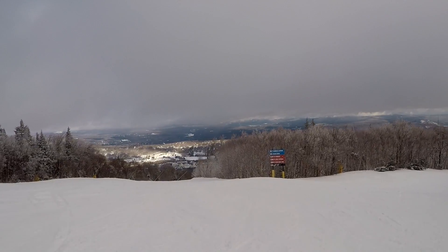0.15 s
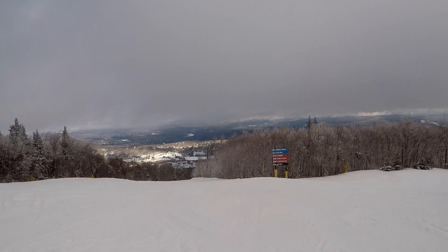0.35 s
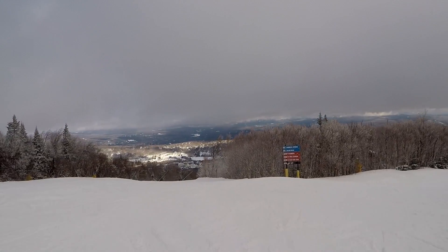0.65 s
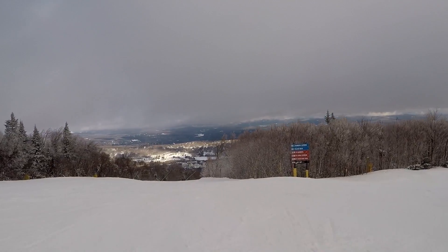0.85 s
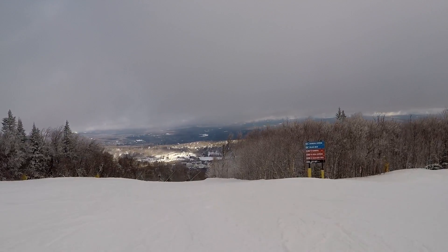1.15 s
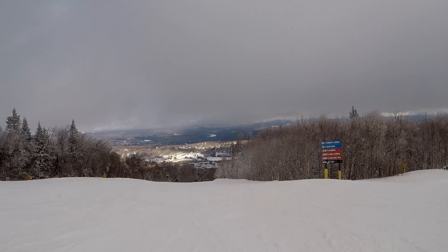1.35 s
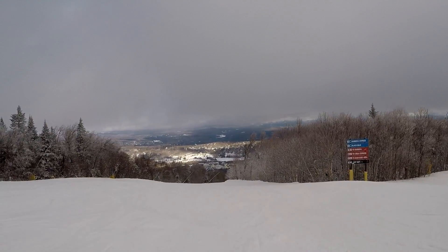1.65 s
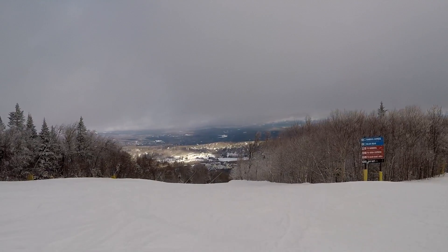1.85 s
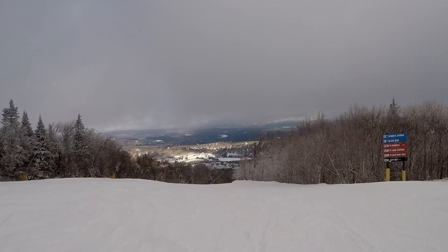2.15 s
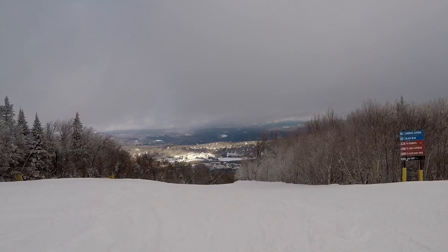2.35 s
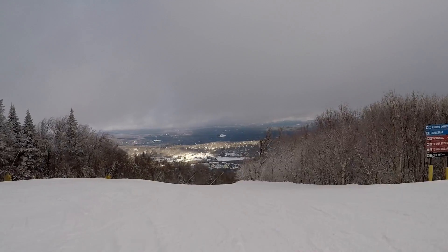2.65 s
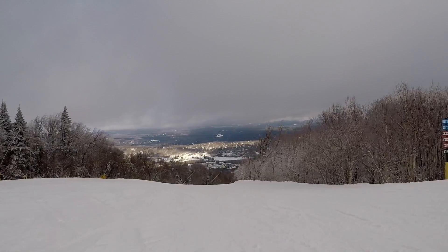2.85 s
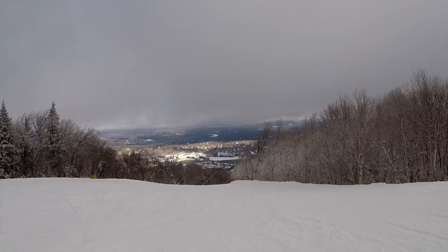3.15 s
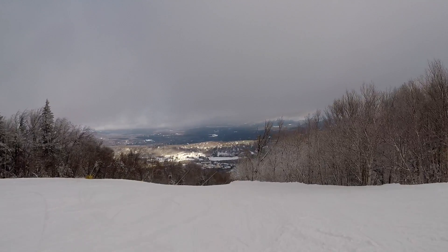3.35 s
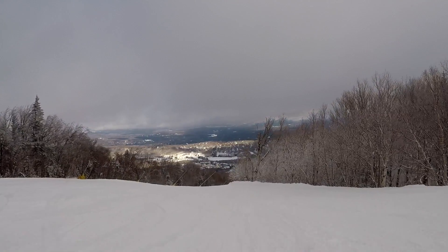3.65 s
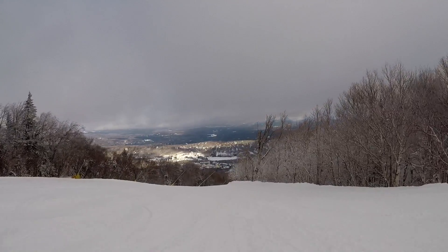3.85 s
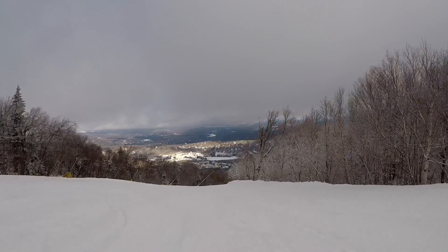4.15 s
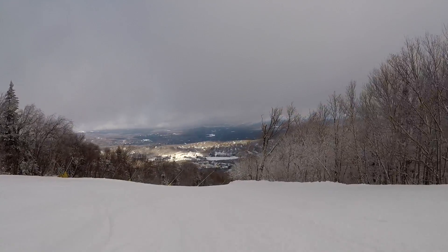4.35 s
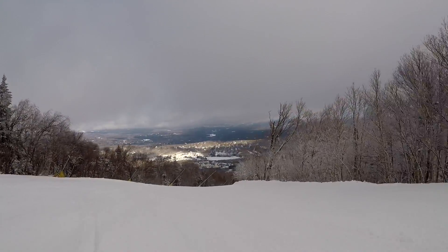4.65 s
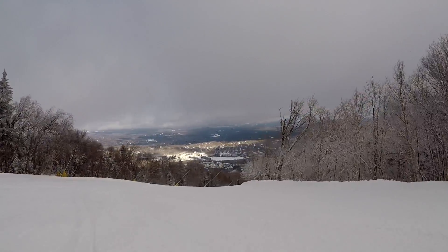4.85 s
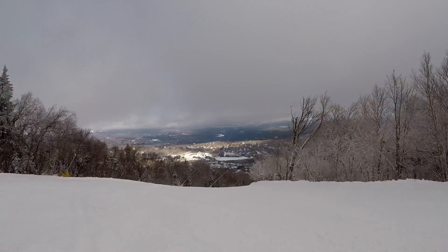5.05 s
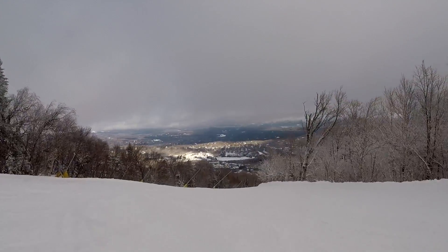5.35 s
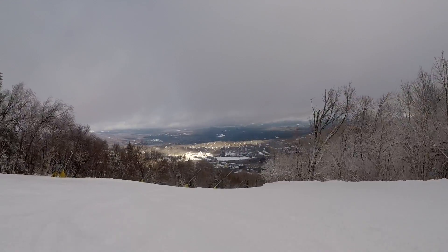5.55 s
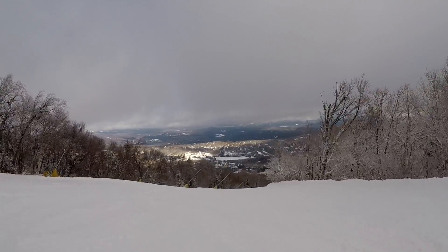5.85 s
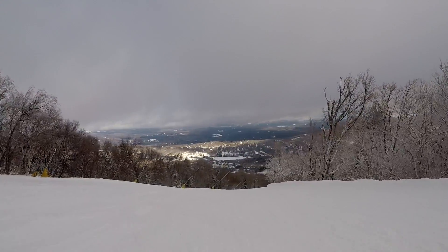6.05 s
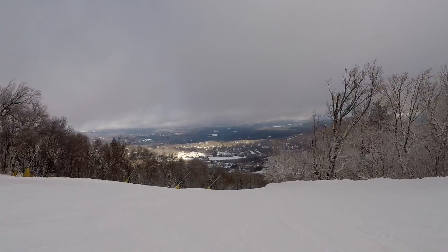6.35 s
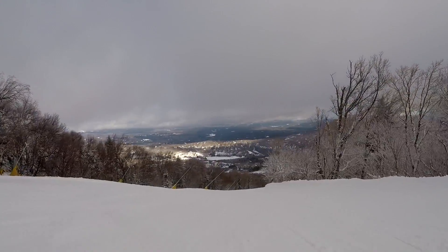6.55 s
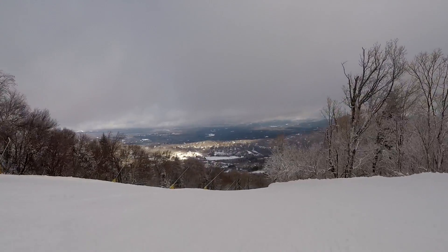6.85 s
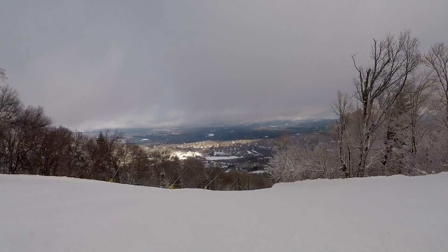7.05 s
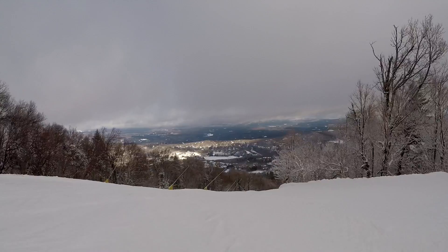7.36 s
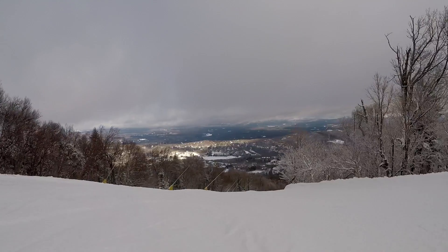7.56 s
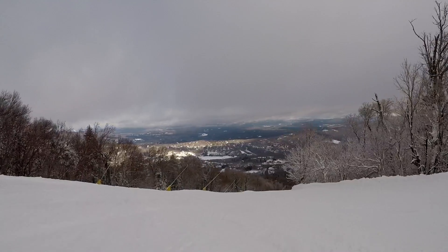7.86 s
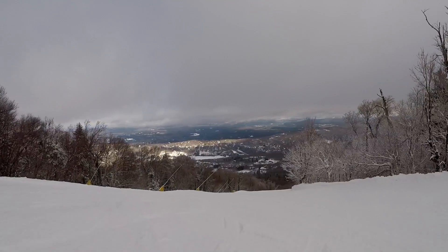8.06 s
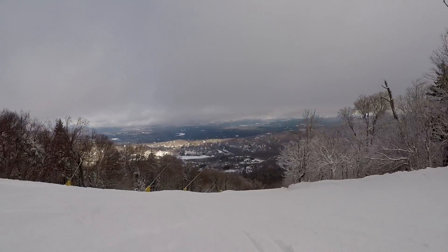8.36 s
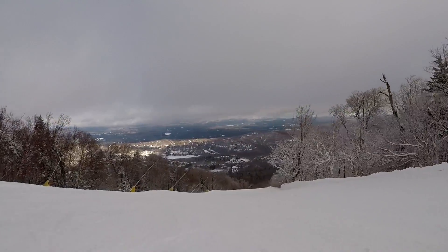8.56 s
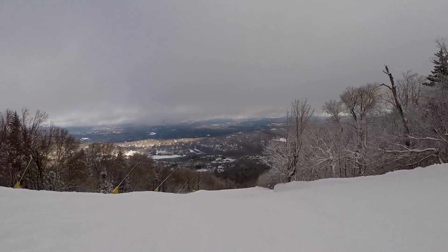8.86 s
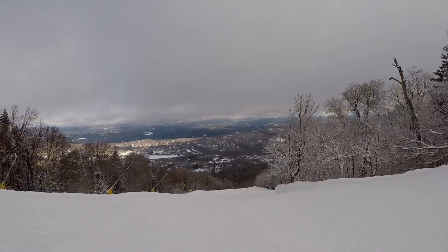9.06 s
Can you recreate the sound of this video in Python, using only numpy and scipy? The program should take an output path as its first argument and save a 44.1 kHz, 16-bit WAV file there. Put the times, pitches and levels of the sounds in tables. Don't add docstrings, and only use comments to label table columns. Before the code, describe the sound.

Skis hiss and scrape over packed snow through successive turns while wind rumbles and slaps at a helmet microphone and its plastic mount knocks.

```python
import sys
import numpy as np
from scipy import signal
from scipy.fft import rfft, irfft, next_fast_len
from scipy.io import wavfile
from scipy.ndimage import uniform_filter1d, minimum_filter1d

SR = 44100
rng = np.random.default_rng(int(sys.argv[2]) if len(sys.argv) > 2 else 0)


def unload_wav(signal):
    wavfile.write(
        sys.argv[1],
        SR,
        np.round(np.clip(np.atleast_2d(signal).T, -1, 1) * 32767).astype(np.int16),
    )


def boost(x):
    u = np.asarray(x, float) / 20
    return 10 ** u


N = 406161


def evened(x):
    return x / np.sqrt(np.mean(x ** 2) + 1e-20)


def peaked(x):
    return x / abs(x).max()


def levelled(x, floor, samples):
    return x / np.sqrt(floor + uniform_filter1d(x ** 2, size=samples))


def read(points, hz):
    f, value = np.transpose(points)
    return np.interp(np.log(hz + 1), np.log(f + 1), value)


def curves(rows, t):
    s, *columns = np.transpose(rows)
    return [np.interp(t, s, c) for c in columns]


def passing(rows, t):
    s, length, *columns = np.transpose(rows)
    at = t[::64]
    swell = np.exp(-((at - s[:, None]) / length[:, None]) ** 2)
    return [np.interp(t, at, c @ swell) for c in columns]


def colour(x, gain):
    size = next_fast_len(N + 8192)
    x = np.append(x, x[:-4097:-1] * np.linspace(1, 0, num=4096))
    return irfft(rfft(x, size) * gain(np.fft.rfftfreq(size, 1 / SR)), size)[:N]


def noise_through(spectrum, drive):
    return evened(colour(drive, lambda f: boost(read(spectrum, f))))


def bass_of(x):
    return colour(x, lambda f: 1 / (1 + (f / 560) ** 8))


def flutter(top_hz):
    return evened(colour(rng.standard_normal(N), lambda f: (f > 2) * (f < top_hz) / np.sqrt(f + 1)))


def crystals(per_s, spread_db):
    size = boost(spread_db * np.minimum(rng.exponential(1, N), 3))
    return evened(size * rng.standard_normal(N) * (rng.random(N) < per_s / SR))


def ring(hz, t60, t):
    return np.sin(2 * np.pi * hz * t) * boost(-60 * t / t60) * (1 - np.exp(-t / .0003))


def add(mix, s, sound):
    part = mix[round(s * SR):][:len(sound)]
    part += sound[:len(part)]


# (edge set [s], hold [s], release [s], load over the glide [dB], side [-1 skidded to 1 carved])
TURNS = [
    (-0.4, 0.37, 0.51, 5, 0.77),
    (0.623, 0.59, 0.42, 7.5, -0.75),
    (2.634, 0.45, 0.39, 10.5, 0.85),
    (3.786, 0.74, 0.22, 7.5, -1.4),
    (5.525, 0.24, 0.88, 6, 0.94),
    (6.554, 0.6, 0.33, 6, -0.42),
    (8.205, 0.41, 0.2, 6.5, 0.64),
]
CARVE_ATTACK_S, SKID_ATTACK_S = 0.057, 0.38
GROWTH_DB = 2


def load(t):
    out = 0
    for s, hold, release, db, side in TURNS:
        attack = np.interp(side, [-1, 1], [SKID_ATTACK_S, CARVE_ATTACK_S])
        moments = s + np.cumsum([0, attack, hold, release])
        out = out + np.interp(t, moments, [0, db - GROWTH_DB * side, db + GROWTH_DB * side, 0])
    return out


# (time [s], wind strength [dB], buffeting round the helmet [dB])
WIND = [(0.0, -16, -37.5), (0.45, -23, -39), (0.8, -16.5, -34), (1.4, -23, -41.5), (1.55, -25, -44.5),
        (2.2, -21, -44), (2.7, -25, -47), (3.0, -20.5, -42.5), (3.6, -23, -45.5), (4.2, -20, -39.5),
        (4.85, -14, -37), (5.3, -19.5, -40.5), (5.6, -14.5, -38.5), (6.3, -10.5, -35), (7.0, -19.5, -38.5),
        (7.75, -11, -40.5), (8.1, -17.5, -28.5), (9.21, -19.5, -47)]
# (time [s], length [s], large eddies over the wind [dB], middle eddies over it [dB])
GUSTS = [(0.0, 0.053, 4.5, -5), (0.18, 0.068, 1.5, 11), (0.35, 0.082, 1.5, -7), (0.93, 0.091, 1, 3.5),
         (1.02, 0.062, 2.5, -8), (1.36, 0.065, 9, -2), (2.44, 0.12, 7, 10.5), (2.56, 0.051, -7, -2),
         (3.0, 0.088, 6.5, -2), (3.15, 0.047, 4, 6.5), (3.92, 0.054, 2.5, 7), (4.18, 0.07, 8, 7.5),
         (4.58, 0.035, 9, 7), (4.77, 0.057, 2, 8), (4.83, 0.043, 6, -9), (5.0, 0.033, 5, 4),
         (5.46, 0.077, 4, 6.5), (5.85, 0.069, -4.5, 10), (5.95, 0.13, -2.5, -7), (6.95, 0.043, -0.5, -1),
         (7.05, 0.075, 4.5, 10), (7.13, 0.037, -0.5, -10), (7.21, 0.024, 6, 6), (7.67, .05, 4.5, -5),
         (7.76, 0.053, 2, 6), (8.13, 0.024, -8, -1), (8.21, 0.065, 6, 9), (8.54, 0.056, 4, 6),
         (8.87, 0.041, -4.5, -9), (9.17, 0.077, 2, 16.5)]
# (time [s], length [s], middle eddies [dB], small eddies [dB])
FLURRIES = [(0.25, 0.16, -1.5, -6), (0.7, 0.16, 2.5, -1), (1.35, 0.06, 1, 2.5), (1.55, 0.07, -4, 1.5),
            (2.0, 0.084, 4, 4.5), (2.5, 0.11, 0.5, 4), (2.76, 0.18, 7, 6.5), (3.47, 0.11, 7, -3),
            (3.62, 0.099, 5, 2.5), (4.5, 0.072, 2.5, 1), (5.0, 0.18, 3.5, 0), (5.3, .07, 0, -4.5),
            (5.55, 0.11, 4.5, -4), (5.92, 0.11, -4.5, -4), (6.1, .08, 0, -0.5), (6.28, .06, 1, 4),
            (6.4, 0.19, 3.5, 1), (8.6, .06, -0.5, 0.5), (9.05, 0.071, 4, 1), (1.2, 0.09, 0.5, 1),
            (6.7, 0.16, 6, -5), (7.45, 0.12, -6.5, -2.5), (7.75, 0.083, 5.5, 6.5), (8.05, 0.1, 2, -3.5),
            (8.4, 0.19, -2.5, -3.5), (8.85, 0.092, 1.5, 2.5)]
# (frequency [Hz], density [dB per Hz])
SLOW_EDDIES = [(3, -17), (6, 0.5), (27, 1), (50, 0), (68, -7.5), (90, -45), (150, -77)]
MIDDLE_EDDIES = [(35, -26), (60, 0.5), (75, 2.5), (110, -3.5), (150, -14), (200, -29), (320, -89)]
SMALL_EDDIES = [(80, -14.5), (140, -0.5), (170, -1.5), (250, -8), (390, -16.5), (500, -24), (700, -34),
                (1000, -66)]
MIDDLE_DB, MIDDLE_PER_WIND, MIDDLE_PER_BUFFET = -27.5, 1, 0.69
BUFFET_PER_LOAD = 0.9
PUSH, PUSH_S = 0.42, 0.015


def wind(t):
    wind_db, small_db = curves(WIND, t)
    small_db = small_db + BUFFET_PER_LOAD * load(t)
    large_db, burst_db = passing(GUSTS, t)
    middle_extra_db, small_extra_db = passing(FLURRIES, t)
    slow_db = wind_db + large_db
    middle_db = MIDDLE_DB + MIDDLE_PER_WIND * (wind_db + 16.5) + MIDDLE_PER_BUFFET * (small_db + 37.5)
    middle_db = middle_db + burst_db + middle_extra_db
    small_db = small_db + small_extra_db

    slow = levelled(noise_through(SLOW_EDDIES, rng.standard_normal(N)), 0.32, 4000)
    lumps = flutter(30)
    middle = noise_through(MIDDLE_EDDIES, boost(3.8 * lumps) * rng.standard_normal(N))
    middle = levelled(middle, 1.0, 4000)
    small = noise_through(SMALL_EDDIES, boost(1.94 * lumps) * rng.standard_normal(N))
    small = levelled(small, 1.1, 4000)

    out = PUSH * np.exp(-(t / PUSH_S) ** 2)
    out = out + boost(slow_db + 1.78) * evened(slow)
    out = out + boost(middle_db + 1.5) * evened(middle)
    return out + boost(small_db + 0.3) * evened(small)


# (time [s], peak [dB])
SLAPS = [(0.26, -44), (0.703, -25.5), (0.794, -30), (0.882, -22.5), (1.162, -29), (1.225, -32.5),
         (4.058, -25.5), (4.581, -21), (4.782, -17), (4.948, -28.5), (6.01, -43), (6.189, -21),
         (6.347, -34), (6.388, -28), (6.468, -24), (6.6, -17), (6.665, -24.5), (6.709, -25), (6.757, -17.5),
         (6.985, -21), (7.169, -33), (8.058, -20.5), (8.102, -23), (8.378, -28), (8.549, -22.5),
         (9.16, -31.5), (0.103, -28), (0.162, -28), (0.221, -35), (0.77, -29.5), (0.832, -27),
         (2.67, -30.5), (2.952, -31.5), (4.25, -32), (4.532, -28), (4.736, -27), (4.885, -31.5),
         (5.471, -32), (5.549, -33), (5.603, -25.5), (5.837, -31), (6.067, -26), (6.289, -25), (6.412, -22),
         (6.565, -23), (7.022, -29), (7.061, -30), (7.722, -28.5), (7.995, -33), (8.132, -27), (8.254, -35),
         (8.493, -25), (9.111, -32)]


def slaps(t):
    puffs, u = np.zeros(N), t[:2600] / 0.0072
    for s, db in SLAPS:
        add(puffs, s, boost(db + 0.5) * u * np.exp(1 - u))
    low = noise_through(SMALL_EDDIES, rng.standard_normal(N))
    return puffs * levelled(low, 0.12, 900)


# (time [s], peak [dB], pitch [Hz], t60 [s], tick over the ring [dB])
RINGS = [
    (1.705, -36, 8880, 0.06, -14),
    (1.7153, -30.5, 8800, 0.058, 7),
    (2.934, -23.5, 8800, 0.073, 2.5),
]


def pole():
    out, t = np.zeros(N), np.arange(6000) / SR
    tick = 2.6 * ring(5600, 0.006, t) + 1.2 * ring(7500, 0.0043, t)
    tick = tick + 0.8 * ring(4040, 0.02, t) + 0.67 * ring(2200, 0.008, t)
    for s, db, hz, t60, tick_db in RINGS:
        add(out, s, boost(db) * (ring(hz, t60, t) + boost(tick_db) * tick))
    return out


# (frequency [Hz], width [Hz], level [dB])
MOUNT = [(2300, 114, 2), (1871, 48, 0), (1430, 710, -12.5), (2420, 140, -3)]
SHAKE_PER_LOAD, BUZZ_DB = 0.35, 1


def mount(t):
    common, out = np.tanh(flutter(61)), 0
    for hz, width, db in MOUNT:
        swing = boost(4.7 * common + 2.6 * np.tanh(flutter(60)))
        shake = swing * (0.54 * rng.standard_normal(N) + .5 * crystals(500, 2.8))
        out = out + boost(db) * colour(shake, lambda f: 1 / (1 + 2j * (f - hz) / width))
    shaking_db = curves(SKIS, t)[2]
    return boost(shaking_db + SHAKE_PER_LOAD * load(t) + BUZZ_DB) * evened(out)


# (time [s], peak [dB], main ring [Hz], sharp edge over the ring [dB], low thud over it [dB])
KNOCKS = [(0.3025, -20, 2310, -9, -9), (0.309, -23, 1980, -6, -6), (0.879, -20, 2300, 1, -10),
          (1.2206, -20, 2350, -7, -5), (2.819, -19, 2430, -6, -16), (4.018, -16, 2250, -8, -23),
          (4.0605, -22, 2320, -6, 5), (4.2122, -19, 2300, 2, 2), (4.2142, -5.5, 2350, -1, -8),
          (4.2284, -17, 2260, -14, -9), (4.372, -14, 2410, -12, -15), (4.6307, -16, 2300, -2, -26),
          (4.6618, -13, 2310, -2, -23), (4.8379, -25, 1980, 1, -17), (5.5683, -21, 2370, 1, -4),
          (5.8918, -16, 2380, 6, -2), (6.3365, -19, 2450, -1, -14), (6.4343, -10, 2290, -15, -26),
          (7.0793, -13, 2330, -5, -7), (7.413, -18, 2410, -8, -11), (7.7544, -20, 1850, -1, -10.5),
          (7.7872, -17, 2300, -14, -18), (8.2067, -36, 2400, -5.5, 12), (8.4731, -20, 2350, -1, 4.5),
          (9.1287, -22, 2370, 6, -20)]
# (time [s], peak [dB])
COMMON_PITCH_KNOCKS = [(0.151, -22), (0.346, -25), (1.6811, -23), (1.9669, -25), (2.507, -27), (3.941, -21.5),
                       (5.0739, -18), (5.1802, -21.5), (5.9319, -21), (6.312, -20), (6.456, -20), (7.194, -25),
                       (7.5925, -19), (7.7084, -18), (7.8708, -19.5), (8.0436, -23), (8.6323, -17)]
# (time [s], peak [dB], main ring [Hz])
PITCHED_KNOCKS = [(0.556, -29, 2470), (0.813, -26, 2370), (0.9667, -21, 2240), (1.077, -25, 2350),
                  (1.460, -22, 2290), (2.208, -26, 2330), (2.738, -29, 1850), (2.9557, -24, 2440),
                  (3.242, -23, 2280), (3.3508, -22, 2340), (4.9977, -28, 1840), (5.033, -28, 2480),
                  (5.5504, -32, 2590), (5.684, -29, 2620), (5.805, -24, 2300), (5.864, -21, 2240),
                  (6.254, -28, 1880), (6.3984, -23, 2270), (6.470, -21, 2330), (6.9267, -21, 2310),
                  (6.955, -21, 1920), (7.2195, -23, 2270), (7.36, -22, 2250), (8.364, -18.5, 2290)]
TAP_HZ, TAP_EDGE_DB, TAP_THUD_DB = 2340, -7, -17
FIRST_TOUCH = 20.
EDGE_HZ, EDGE_SPREAD_HZ, EDGE_T60_S = 4420, 30, .009
SNAP, SNAP_HZ, SNAP_T60_S = 1.7, 4800, 0.0011


def knocks():
    out, t = np.zeros(N), np.arange(1600) / SR
    early = t[:500]
    rows = KNOCKS + [(s, db, TAP_HZ, TAP_EDGE_DB, TAP_THUD_DB) for s, db in COMMON_PITCH_KNOCKS]
    rows += [(s, db, hz, TAP_EDGE_DB, TAP_THUD_DB) for s, db, hz in PITCHED_KNOCKS]
    roughness = rng.standard_normal((len(rows), 500))
    for (s, db, hz, edge_db, thud_db), noise in zip(rows, roughness):
        contact = noise * np.exp(-early / 0.0025) * (1 - np.exp(-early / 0.00057))
        contact[0] = FIRST_TOUCH
        body = ring(hz, 0.017, t) + 0.15 * ring(1900, 0.018, t) + 0.28 * ring(1.265 * hz, 0.018, t)
        edge = 0.7 * ring(EDGE_HZ + EDGE_SPREAD_HZ * noise[3], EDGE_T60_S, t)
        edge = edge + 1.3 * ring(6000, 0.0034, t) + 0.59 * ring(3520, 0.0063, t)
        edge = edge + SNAP * ring(SNAP_HZ, SNAP_T60_S, t)
        thud = ring(1370, 0.011, t) + 0.55 * ring(855, 0.013, t)
        body, edge, thud = (peaked(np.convolve(contact, part)) for part in (body, edge, thud))
        blow = body + boost(edge_db + 3.0) * edge + boost(thud_db - 2.5) * thud
        add(out, s, boost(db - 6.0) * blow)
        add(out, s + 0.009 + 0.0046 * noise[1], boost(db - 13.0 + 2.4 * noise[2]) * body)
    return out


# (time [s], straight glide [dB], hiss centre as the edge tilts [Hz], shaking of the helmet [dB])
SKIS = [(0.0, -41, 5500, -52), (0.6, -41, 5150, -50), (1.1, -40.5, 5270, -49), (1.65, -41.5, 4950, -48),
        (2.3, -41.5, 5400, -50), (2.62, -41, 5200, -52.5), (2.9, -42, 5700, -50.5), (3.35, -43, 5600, -49),
        (3.6, -43, 5480, -53.5), (4.2, -42, 5070, -47.5), (4.95, -41.5, 5160, -47.5),
        (5.45, -42, 5230, -51), (5.9, -40.5, 5520, -48.5), (6.45, -42, 5400, -49), (7.2, -39.5, 5000, -43),
        (7.85, -40.5, 5370, -47), (8.5, -38.5, 5610, -49), (9.21, -40, 5440, -48)]
# (time [s], length [s], grip [dB], ice scrape [dB], thrown spray [dB])
PATCHES = [(0.02, 0.066, 0, 1.5, 1), (1.23, 0.062, -2.5, 5, 3), (0.894, 0.16, 0.5, 3, 4.5),
           (1.104, 0.046, 1, 5, 4), (1.62, 0.085, 0, -3, 0.5), (1.9, 0.036, -0.5, -6, 1),
           (2.17, 0.21, -1, 5, 0), (2.49, 0.024, -6, -2, -3), (2.68, .018, 0, 2, 3),
           (2.73, 0.044, 0.5, 2, 5), (5.3, .1, 0, 2, 0), (2.946, 0.099, 1.5, 2, 3.5),
           (3.104, 0.078, 0, 5, -2), (2.9, 0.026, 1.5, -0.5, 0), (3.6, 0.091, 1, 3.5, 1.5),
           (8.95, .08, 1, 0.5, 3), (7.05, .1, 0, -0.5, 1.5), (4.18, 0.12, 1, -1.5, 3),
           (4.56, 0.15, 1, 0, 0.5), (5.055, 0.14, 3, 6, -1), (5.5, 0.038, 2.5, 2.5, -7),
           (5.62, 0.037, 2.5, 4.5, 2), (5.77, 0.081, 1, -5.5, 1), (5.85, 0.085, 2, 5.5, 0.5),
           (6.44, 0.055, 1.5, 7.5, 0), (7.8, 0.098, 1.5, 9.5, 1), (8.26, 0.071, -2, 5.5, 7),
           (8.57, 0.078, 2, 6.5, -1), (8.74, 0.036, 1.5, -2.5, 2), (8.38, .05, 0, 0.5, 0),
           (8.5, .03, 0, -0.5, -2), (1.19, 0.021, -1.5, 0, -1), (0.96, .05, 0.5, 0.5, 1.5),
           (3.03, 0.053, 1.5, 1, -1), (2.78, 0.054, -1, 0.5, 1), (2.8, .05, 0.5, 1.5, 0),
           (8.82, 0.079, -2.5, 4.5, 3)]
# (time [s], length [s], level [dB])
POWDER = [(0.05, .06, 4), (0.55, .1, 6), (2.55, .09, -6), (2.7, .02, 1), (2.74, .04, 2), (1.05, .15, 0),
          (3.35, .12, -3), (4.55, .13, 7), (5.48, .06, -4), (5.6, .04, 1), (7.755, .008, 8), (9.02, .04, 3),
          (7.8, .1, -3), (8.12, 0.068, -4), (8.52, 0.07, 4), (8.32, .06, 3), (8.72, .05, 2), (8.9, .04, 2)]
# (frequency [Hz], density [dB per Hz]); HISS slides with the tilt
HISS = [(1500, -29), (2600, -8.5), (3300, -11.5), (4300, -2.5), (5500, 1.5), (6800, -2.5), (7900, -12),
        (10000, -31), (14000, -52)]
SCRAPE = [(300, -5.5), (500, 7), (800, 2), (1450, 1), (2000, -3.5), (3000, -3.5), (4500, 0.5), (7000, -42)]
SPRAY = [(5500, -8), (7500, -3), (9000, 1), (10500, -9), (11500, -23.5), (13000, -40)]
FINEST = [(9000, -25), (11000, -7.5), (12300, -1.5), (14000, -4), (15200, -8), (16000, -40)]
FINEST_PER_SPRAY = 0.5


def skis(t):
    glide_db, centre_hz, _ = curves(SKIS, t)
    grip_db, ice_db, thrown_db = passing(PATCHES, t)
    hiss_db = glide_db + load(t) + grip_db

    def follow(db, per_hiss_db, per_tilt_khz):
        return db + per_hiss_db * (hiss_db + 35) + per_tilt_khz * (centre_hz - 5400) / 1000

    scrape_db = follow(-48.5, 1.14, 0.1) + ice_db
    spray_db = follow(-49, 0.76, -6.5) + thrown_db
    finest_db = follow(-59, 0.49, -2.0) + FINEST_PER_SPRAY * thrown_db + passing(POWDER, t)[0]
    chatter = flutter(35)

    grains = 0.85 * rng.standard_normal(N) + .5 * crystals(3500, 2.7)
    hz, at, z = signal.stft(grains, SR, nperseg=512, noverlap=384)
    slide = (np.interp(at, t, centre_hz) / 5400) ** 1.1
    mottle = uniform_filter1d(rng.standard_normal(z.shape), size=8, axis=0)
    mottle = evened(uniform_filter1d(mottle, size=14, axis=1))
    hump = boost(read(HISS, hz[:, None] / slide) + 1.43 * mottle)
    hump /= np.sqrt((hump ** 2).mean(0))
    hiss = evened(signal.istft(z * hump, SR, nperseg=512, noverlap=384)[1][:N])

    coarse = boost(1.6 * flutter(40)) * (0.73 * rng.standard_normal(N) + .5 * crystals(500, 1.3))
    fine = 1.7 * rng.standard_normal(N) + 0.2 * crystals(2000, 3.2)
    layers = boost(hiss_db) * hiss
    layers += boost(scrape_db + 5.0) * noise_through(SCRAPE, coarse)
    layers += boost(spray_db) * noise_through(SPRAY, fine)
    layers += boost(finest_db - 1.5) * noise_through(FINEST, fine)
    return boost(1.05 * chatter) * layers


def scene():
    t = np.arange(N) / SR
    return (wind(t) + slaps(t) + skis(t) + mount(t) + knocks() + pole())[None]


# (frequency [Hz], width [Hz], depth [dB])
CASE_NOTCHES = [(565.5, 101.4, -15), (1112, 125, -12)]


def case(x):
    def gain(f):
        depth_db = sum(db * np.exp(-((f - hz) / width) ** 2) for hz, width, db in CASE_NOTCHES)
        return boost(depth_db) * (f < 15230)
    return colour(x, gain)


def bass_limiter(x, ceiling=.56):
    bass = bass_of(x)
    room_left = np.minimum(ceiling / (abs(bass) + 1e-9), 1)
    gain = uniform_filter1d(minimum_filter1d(room_left, size=1500), size=1500)
    return x + bass * (gain - 1)


def roll_off(x):
    return signal.sosfilt(signal.butter(12, 15230, fs=SR, output="sos"), x)


def record(dry):
    held = bass_limiter(case(dry[0])) + .0028
    lull = np.cos(np.pi / 2 * np.minimum(np.arange(N)[::-1] / 500, 1)) ** 2
    held -= lull * bass_of(held)
    return roll_off(held[None])


dry = scene()
out = record(dry)
unload_wav(out)
```